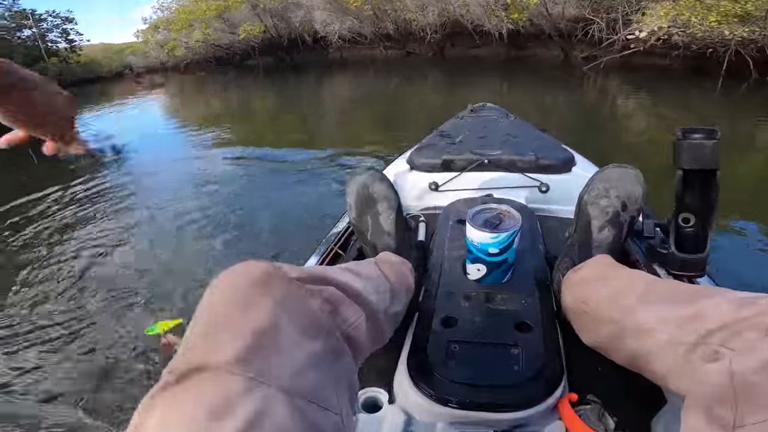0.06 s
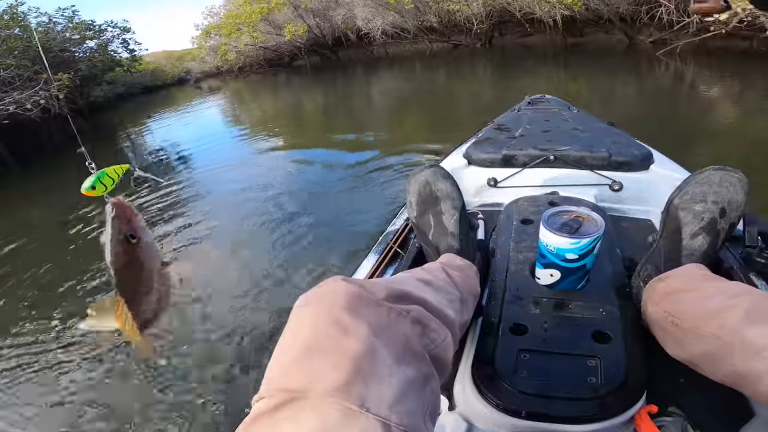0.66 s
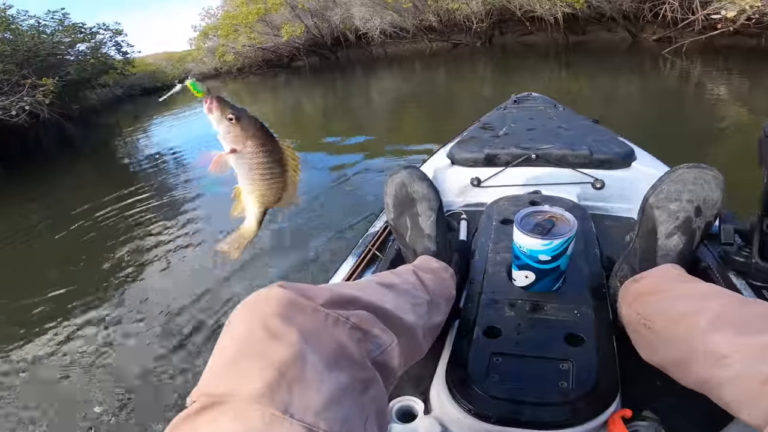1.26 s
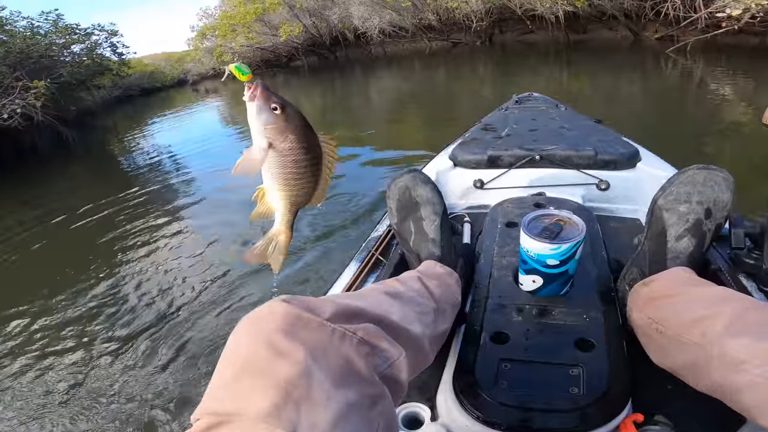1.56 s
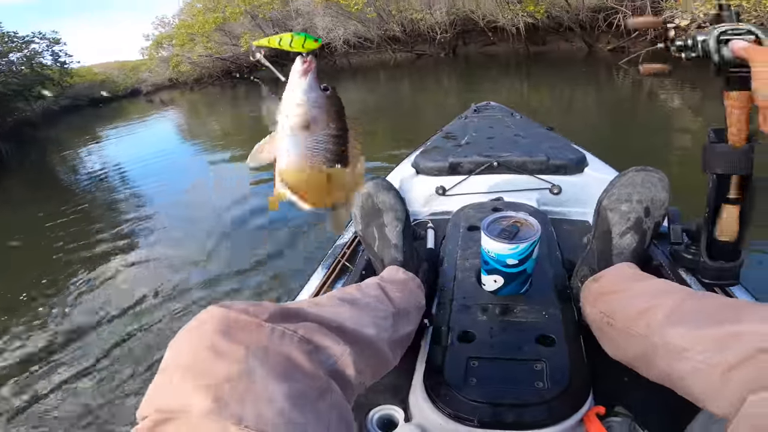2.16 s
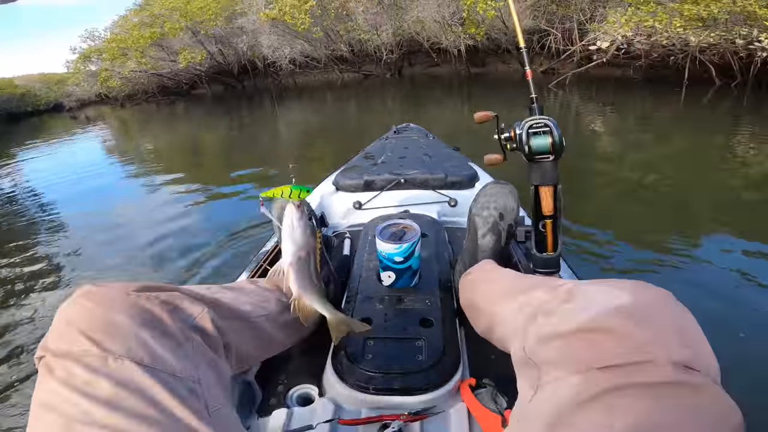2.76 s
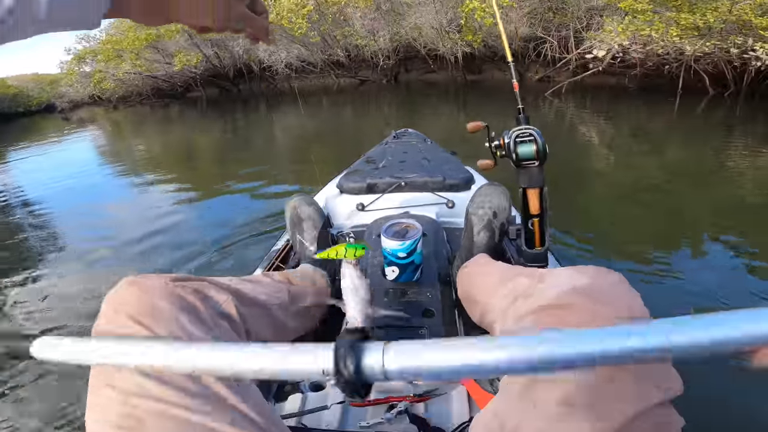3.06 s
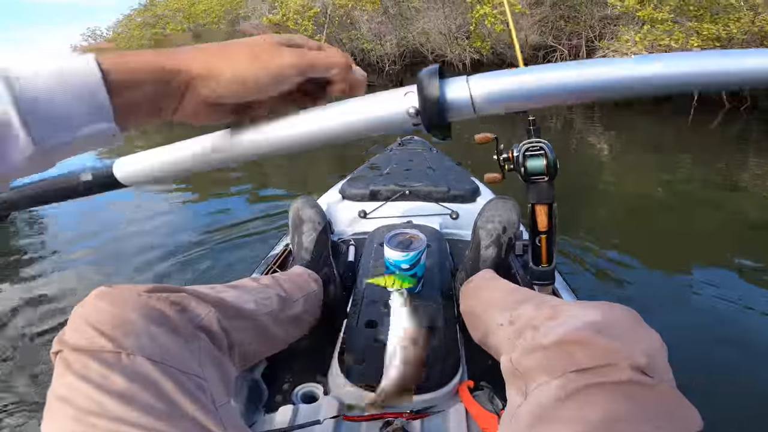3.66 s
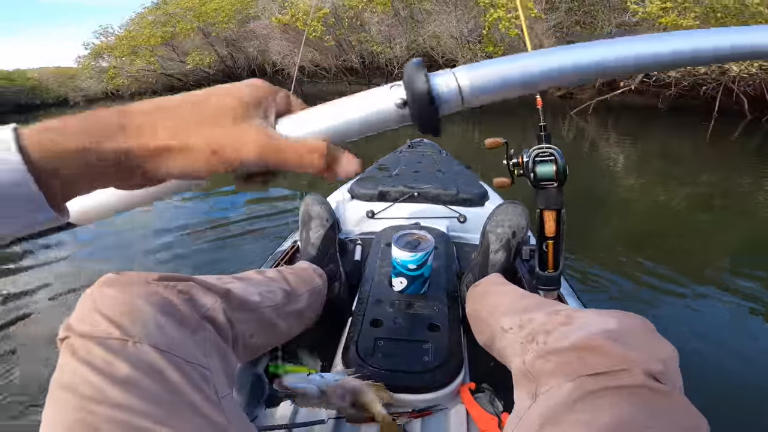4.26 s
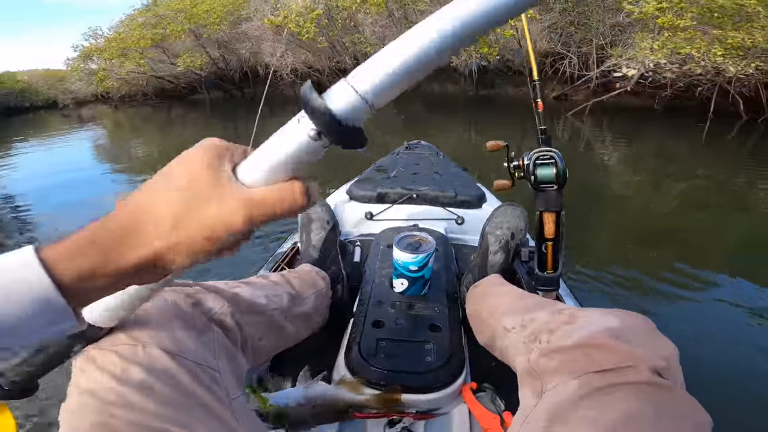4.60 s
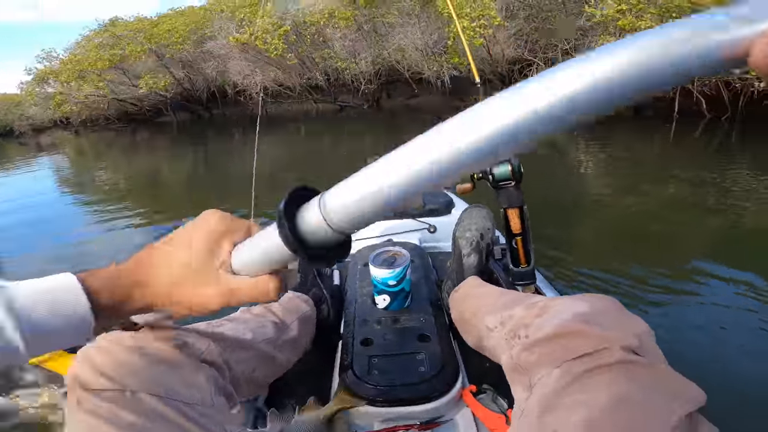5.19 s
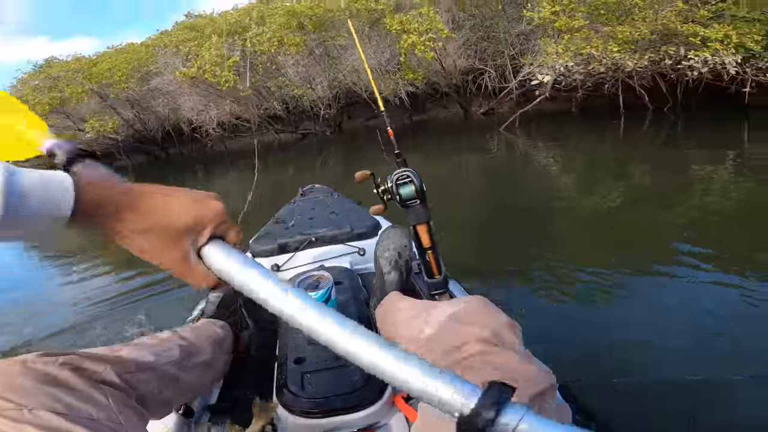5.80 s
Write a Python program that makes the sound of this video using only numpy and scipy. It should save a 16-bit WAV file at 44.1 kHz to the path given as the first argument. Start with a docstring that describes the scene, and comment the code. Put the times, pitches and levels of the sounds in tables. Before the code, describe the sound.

A beaded fishing lure rattles as a hooked fish thrashes and knocks on a hollow plastic kayak, then a paddle stirs bubbling water.

```python
"""A beaded lure rattles as a small hooked fish is swung aboard a plastic kayak on a quiet creek.
Close to the body-worn microphone, the beads strike the lure's shell and burst out when the fish thrashes.
Water drips off the fish, the line rasps, and rod, feet and fish knock and drag on the hollow hull.
At the end, on the left, a sleeve rustles and a paddle blade dips in and pulls, stirring up bubbles.
A light breeze buffets the microphone throughout."""
import sys
import numpy as np
from scipy import signal
from scipy.io import wavfile
from scipy.ndimage import uniform_filter1d, map_coordinates

SR = 44100
rng = np.random.default_rng(int(sys.argv[2]) if len(sys.argv) > 2 else 0)


def unload_wav(signal):
    """Save mono or channel-first audio to the path in sys.argv[1] as 16-bit WAV at rate SR, clipped to [-1, 1]."""
    wavfile.write(
        sys.argv[1],
        SR,
        np.round(np.clip(np.atleast_2d(signal).T, -1, 1) * 32767).astype(np.int16),
    )


N = 261821


def amp(db):
    """Decibels to gain."""
    return 10 ** (np.asarray(db) / 20)


def unit(x):
    """Scales to rms 1."""
    return x / np.sqrt(np.mean(x ** 2) + 1e-20)


def read(points, hz):
    """Reads a curve on a log-frequency axis."""
    f, value = np.transpose(points)
    return np.interp(np.log(hz + 1), np.log(f), value)


def level(rows):
    """A curve in dB as a gain for every sample."""
    s, db = np.transpose(rows)
    return amp(np.interp(np.arange(N) / SR, s, db))


def bouts(rows, attack_s, t60, swell=0):
    """Gain of movements that rise, hold and die away; swell adds a share of their length to the rise."""
    t = np.arange(N) / SR
    power = np.zeros(N)
    for s, length, db in rows:
        rise = np.clip((t - s) / (attack_s + swell * length), 0, 1)
        power += (rise * amp(db - 60 * np.maximum(t - s - length, 0) / t60)) ** 2
    return np.sqrt(power)


def add(mix, s, sound):
    """Mixes a sound in at time s."""
    part = mix[..., max(round(s * SR), 0):][..., :sound.shape[-1]]
    part += sound[..., :part.shape[-1]]


def colour(x, points, tilt_db=0, size=2048):
    """Causal filter with the given spectrum, tilted by tilt_db per octave above 500 Hz."""
    hz = abs(np.fft.fftfreq(size, 1 / SR))
    log_gain = np.log(amp(read(points, hz) + tilt_db * np.log2(np.maximum(hz, 500) / 2000)))
    taps = np.fft.ifft(np.exp(np.conj(signal.hilbert(log_gain)))).real
    return signal.oaconvolve(x, taps.reshape((1,) * (x.ndim - 1) + (-1,)), axes=-1)[..., :x.shape[-1]]


def band(x, hz, kind, order=2):
    """Butterworth filter."""
    return signal.sosfilt(signal.butter(order, hz, kind, fs=SR, output="sos"), x)


def pair(count, apart):
    """Left and right noise: alike when apart is 0, independent at 1."""
    mid, side = rng.standard_normal((2, count))
    return unit(np.array([mid + apart * side, mid - apart * side]))


def place(x, left_db):
    """Leans a sound to the left of the microphone."""
    return x * amp(np.array([[left_db], [-left_db]]) / 2)


def wander(count, size):
    """A random curve of rms 1 that changes over size samples."""
    return unit(uniform_filter1d(uniform_filter1d(rng.standard_normal(count), size), size))


def impulses(count, per_s, spread_db):
    """Tiny impacts at random moments, a few much harder than the rest."""
    chance, size, sign = rng.random(count), rng.exponential(1, count), rng.choice([-1, 1], count)
    return (chance < per_s / SR) * sign * amp(spread_db * np.minimum(size, 3))


# Breeze on the microphone. Each row: time in seconds, level in dB.
GUSTS = [(0, -27), (.2, -36.5), (.9, -46), (1.3, -47), (2.3, -48.5), (3.2, -38), (3.9, -53), (4.8, -45),
         (5.3, -56), (5.94, -50.5)]
# Its rumble, and the air over the creek. Each row: frequency in Hz, relative level in dB.
GUST_SPECTRUM = [(12, -3), (30, -0.5), (55, 3), (100, -12.5), (180, -18), (400, -34), (1500, -72)]
CREEK_SPECTRUM = [(60, -2.5), (200, -7), (800, -21.5), (1700, -22.5), (4000, -21.5), (6200, -25),
                  (12000, -36.5), (16000, -94)]

def air():
    """A light breeze buffets the microphone over the faint, wide hiss of the creek."""
    gusts = unit(colour(pair(N, 0.77), GUST_SPECTRUM, size=8192)) * level(GUSTS)
    return gusts + amp(-60) * unit(colour(pair(N, 0.74), CREEK_SPECTRUM))


def bubble(hz, t60, rough=0, rise=0.064):
    """A bubble rings and rises in pitch as it nears the surface; churning water roughens it."""
    t = np.arange(int(t60 * SR)) / SR
    churn = 1 - rough + rough * (wander(len(t), size=60) + 1j * wander(len(t), size=60))
    turns = hz * (t + rise * t ** 2 / t60 / 2)
    return amp(-60 * t / t60) * (1 - np.exp(-t * hz)) * (churn * np.exp(2j * np.pi * turns)).imag


def slosh(per_s, spray_db):
    """Short-lived bubbles of 36 sizes, per_s of each a second, with clumps of fine spray."""
    swarm = np.zeros((2, N))
    for hz in np.geomspace(220, 3800, 36):
        ring = bubble(hz, t60=0.042 * (1000 / hz) ** 0.5) * (hz / 1000) ** 0.064
        swarm += place(signal.oaconvolve(impulses(N, per_s, 3), ring)[:N], rng.normal(0, 2))
    spray = impulses(N, 60 * per_s, 3.5) * pair(N, .3) * amp(3 * wander(N, size=400))
    return unit(swarm) + amp(spray_db) * unit(spray)


# Water running off the fish. Each row: start in seconds, length in seconds, level in dB.
RUNOFF = [(-0.02, 0.023, -50.5), (.28, 0.057, -60.5), (.46, .17, -59.5), (.72, 0.54, -61.5),
          (1.78, 0.99, -62.5), (2.74, 0.051, -46), (2.85, .14, -62.5)]
# Drops landing on the creek. Each row: frequency in Hz, relative level in dB.
PATTER_SPECTRUM = [(300, -13), (900, -2), (1600, -5), (3000, 0), (4300, -1.5), (6000, -10.5), (14000, -28)]

def drips(paddle_spray):
    """Drops from the fish, and later from the paddle, patter on the creek to the left."""
    falling = bouts(RUNOFF, attack_s=0.0079, t60=.3) + paddle_spray
    patter = unit(colour(slosh(per_s=32, spray_db=14.5), PATTER_SPECTRUM))
    return place(patter * falling, left_db=6.8)


# Modes of the lure's plastic shell. Each row: frequency in Hz, width in Hz, relative level in dB.
SHELL_MODES = [(3130, 370, -1.5), (4120, 250, -4), (4970, 320, -1), (5400, 130, 2), (5770, 230, 2),
               (6254, 370, 12.5), (6850, 300, -30), (9240, 760, -0.5), (9620, 98, -8), (12100, 430, -27)]
# A bare bead's click. Each row: frequency in Hz, relative level in dB.
CLICK_SPECTRUM = [(300, -42), (1200, -18.5), (2500, -2), (4000, 10.5), (6500, 3), (8000, 1.5), (10000, -5),
                  (13000, -9.5), (16000, -30)]

def shell(strikes, click_db, vary=0.59):
    """Each strike clicks and rings the modes in its own mixture, unlike on each side as the lure twists."""
    count, t = len(strikes), np.arange(700) / SR
    ring = np.zeros((2, count))
    for hz, width, db in SHELL_MODES:
        drive = strikes * (1 - vary + vary * pair(count, 0.95))
        mode = width * np.exp(-np.pi * width * t) * np.sin(2 * np.pi * hz * t)
        ring += amp(db) * signal.oaconvolve(drive, mode[None], axes=1)[:, :count]
    clicks = colour(strikes * (0.6 + .5 * pair(count, 0.33)), CLICK_SPECTRUM)
    return unit(unit(ring) + amp(click_db) * unit(clicks))


def hops(strikes, mean_gap_s=.0012, hop_db=-3.5):
    """Every bead hops twice more, weaker each time, before it comes to rest."""
    at = np.flatnonzero(strikes)
    out, size = strikes.copy(), strikes[at]
    for gap, turn in rng.random((2, 2, len(at))):
        at = np.minimum(at + (mean_gap_s * SR * (.5 + gap)).astype(int), len(out) - 1)
        size = size * amp(hop_db) * np.sign(turn - .5)
        out[at] += size
    return out


# The fish wriggles on the line. Each row: start in seconds, length in seconds, level in dB.
FISH_WRIGGLES = [(0.0, 0.037, -60), (0.26, 0.025, -49.5), (0.43, 0.017, -52), (0.5, 0.13, -56),
                 (0.71, 0.2, -48.5), (1.01, .25, -47.5), (1.31, 0.05, -58), (1.48, 0.041, -49.5),
                 (1.75, 0.197, -49), (2.02, 0.19, -44), (2.29, 0.11, -44.5), (2.48, 0.099, -54),
                 (3.04, 0.0733, -58.5), (3.51, .1, -35), (3.69, .25, -35), (4.03, 0.46, -39),
                 (4.73, 0.12, -37.5), (4.89, 0.15, -41.5), (5.48, 0.064, -48), (5.64, 0.23, -44.5)]
# The dangling lure sways between bouts. Each row: time in seconds, level in dB.
LURE_SWAY = [(0.2, -77), (0.66, -70.5), (0.95, -57), (1.45, -65.5), (2.0, -54), (3.15, -72), (3.45, -48.5),
             (4.0, -44), (4.6, -54), (5.3, -54.5), (5.94, -55)]

def rattle():
    """The beads strike faster and louder with harder shaking; quiet rattling has its top filtered off."""
    shake = np.hypot(level(LURE_SWAY), bouts(FISH_WRIGGLES, attack_s=0.0069, t60=0.17, swell=0.04))
    clumps = amp(2.5 * wander(N, size=220))  # beads bounce in quick runs
    per_s = 220 * clumps * (shake / amp(-48)) ** .7
    beads = shell(hops(impulses(N, per_s, spread_db=3.5) * np.sqrt(clumps)), click_db=-7)
    running_rms = np.sqrt(abs(uniform_filter1d((beads ** 2).mean(0), 3500)) + 0.0072)
    lowpassed = signal.oaconvolve(beads, signal.firwin(15, 11340, fs=SR)[None], "same")
    treble_share = np.minimum(shake / amp(-37.5), 1)
    return shake * (lowpassed + treble_share * (beads - lowpassed)) / running_rms


def twist(x, patchy_db):
    """As the lure twists, different parts of its ring point at the microphone."""
    spectra = signal.stft(x, nperseg=256)[2]
    patches = rng.standard_normal(spectra.shape[1:])
    patches = uniform_filter1d(uniform_filter1d(patches, size=5, axis=0), size=5, axis=1)
    return signal.istft(spectra * unit(amp(patchy_db * unit(patches))))[1][:, :N]


def cockpit(x, wet_db, t60):
    """Deck, legs and gear around the microphone scatter a short tail."""
    t = np.arange(SR // 8) / SR
    tail = pair(len(t), 0.16) * amp(-60 * t / t60) * (1 - np.exp(-t / 0.0081))
    return x + amp(wet_db) * signal.oaconvolve(x, tail / np.linalg.norm(tail[0]), axes=1)[:, :N]


# The lure's balance at the microphone. Each row: frequency in Hz, left over right in dB.
LURE_BALANCE = [(2000, -1), (4400, 4.5), (6300, -4.5), (8500, -6.5), (15000, -9)]

def lure():
    """Beads and hooks sound close to the microphone, with the cockpit around them."""
    beads = twist(rattle() + jerks(), patchy_db=2.7)
    left, right = cockpit(beads + hooks(), wet_db=-16, t60=.05)
    return np.array([colour(left, [(hz, db / 2) for hz, db in LURE_BALANCE]),
                     colour(right, [(hz, -db / 2) for hz, db in LURE_BALANCE])])


def struck(x, db):
    """Sets the rms level of a blow's first 30 ms or so."""
    return amp(db) * x / np.sqrt(np.mean(x[..., :1300] ** 2) + 1e-20)


# Modes of the hull. Each row: frequency in Hz, relative level in dB, t60 in seconds.
HULL_MODES = [(48, -6, .22), (84, -4, .24), (126, 3, .22), (140, 3, .18), (180, -4, .17), (228, -4, .17),
              (280, -5, .13), (335, -1, .13), (388, -2, .11), (445, -1, .09), (503, 1, .1), (590, -2, .08),
              (720, -7, .07), (970, -9, .05), (1180, -12, .05)]
# The air inside it. Each row: frequency in Hz, relative level in dB.
CAVITY_SPECTRUM = [(25, -10), (50, -4), (130, 9), (240, 1.5), (400, -12), (600, -8), (1000, -32),
                   (3000, -43.5), (8000, -58)]
# How long that air rings. Each row: frequency in Hz, t60 in seconds.
CAVITY_DECAY = [(50, 1), (200, 0.43), (500, 0.54), (1500, 0.6), (6000, 0.25)]

def hull_ring(t):
    """The hull's modes ring, in another mixture at each spot struck, and the air inside rings on."""
    hz, db, t60 = np.transpose(HULL_MODES)[:, :, None]
    spot, detune = rng.standard_normal((2, len(HULL_MODES), 1))
    turns = hz * (1 + .05 * detune) * t + rng.random((len(HULL_MODES), 1))
    modes = (amp(db + 2 * spot - 60 * t / t60) * np.sin(2 * np.pi * turns)).sum(0)
    modes *= 1 - np.exp(-t / 0.00068)  # the wall takes a moment to give
    f, when, noise = signal.stft(pair(len(t), 0.055), SR, nperseg=1024)
    cavity_db = read(CAVITY_SPECTRUM, f)[:, None] - 60 * when / read(CAVITY_DECAY, f)[:, None]
    inside = signal.istft(noise * amp(cavity_db), SR)[1][:, :len(t)]
    return struck(modes, 0) + struck(inside * (1 - np.exp(-t / 0.0095)), -11.5)


# Blows on the hull. Each row: start in seconds, relative levels of boom, body and crack in dB,
# t60 of the crack in seconds.
HULL_BLOWS = [(0.073, -37, -73, -70, .035), (0.133, -33.5, -68, -62.5, .024),
              (0.207, -50, -46.5, -49.5, 0.029), (0.498, -17, -25, -42.5, 0.072),
              (0.515, -21, -21.5, -31, 0.019), (0.583, -30.5, -49.5, -43, 0.017),
              (0.787, -21.5, -36, -49.5, 0.035), (0.997, -45, -41.5, -48, 0.051),
              (1.133, -43, -35, -59, 0.051), (1.326, -30, -34.5, -41.5, 0.027),
              (1.662, -16, -26, -41.5, 0.015), (1.741, -31, -29.5, -47.5, 0.021),
              (1.809, -30.5, -40, -51.5, 0.015), (1.921, -28.5, -23.5, -52.5, 0.11),
              (2.29, -45, -38, -47, 0.0246), (2.312, -23, -17.5, -35, .035),
              (2.327, -38.5, -21.5, -33, 0.043), (2.375, -37.5, -21.5, -40.5, .02),
              (2.41, -7.5, -7.5, -23.5, 0.021), (2.557, -19, -13.5, -27, 0.032),
              (2.642, -29.5, -29.5, -42.5, 0.019), (2.688, -39, -33, -44, 0.04),
              (2.833, -40, -40.5, -46, 0.032), (2.957, -54.5, -67, -48, 0.053),
              (3.019, -31, -45.5, -78, 0.032), (3.095, -40, -70, -75.5, 0.036),
              (3.129, -32.5, -39.5, -55.5, .02), (3.189, -30, -60, -61, 0.018),
              (3.526, -18, -37, -24, 0.051), (3.534, -18.5, -19.5, -23, 0.1),
              (3.571, -45, -46, -23.5, 0.15), (3.849, -17, -20, -30.5, 0.071),
              (3.863, -21.5, -24, -28.5, 0.05), (3.91, -24, -28, -35, 0.038), (4.007, -52, -42, -49, 0.078),
              (4.2, -55.5, -43.5, -33.5, 0.023), (4.331, -44, -47, -43.5, 0.021),
              (4.352, -39, -33.5, -43, 0.065), (4.666, -29.5, -25.5, -38.5, 0.08),
              (5.526, -48, -25, -45, 0.14)]
# The crack of the plastic wall. Each row: frequency in Hz, relative level in dB.
CRACK_SPECTRUM = [(100, -32.5), (500, 16.5), (1000, 17.5), (1500, 13.5), (2200, 12), (3300, 6.5),
                  (4700, 0.5), (6500, -15), (10000, -31), (16000, -63)]

def knocks():
    """Rod, feet and fish hit the kayak just below the microphone: the wall cracks, the hull booms."""
    out, t = np.zeros((2, N)), np.arange(SR * 3 // 4) / SR
    for s, boom_db, body_db, crack_db, crack_t60 in HULL_BLOWS:
        ring = hull_ring(t)
        boom = struck(band(ring, 134, "low"), boom_db - 2)
        # a soft blow with little crack stays in contact longer and misses the upper modes
        contact_hz = np.clip(680 * 2 ** ((crack_db - body_db) / 18), 200, 1400)
        body = struck(band(band(ring, 155, "high", order=3), contact_hz, "low", order=3), body_db - 2)
        decay = amp(-60 * t / crack_t60) + amp(-20.5 - 60 * t / 0.26)
        chatter = pair(len(t), 0.41) * (1 - np.exp(-t / 0.00027)) * decay
        tilt_db = 2 - 3 * np.log2(crack_t60 / 0.03124)  # long, soft, wet slaps are dull
        crack = struck(colour(chatter, CRACK_SPECTRUM, tilt_db), crack_db + .5)
        add(out, s, boom + body + crack)
    return out


# The fish is hoisted. Each row: start in seconds, length in seconds, level in dB.
HOIST = [(.13, .37, -61)]
# The rasp of line on rod. Each row: frequency in Hz, relative level in dB.
GUIDE_SPECTRUM = [(900, -29.5), (1400, 3.5), (1650, 1), (2000, -15.5), (2700, -10.5), (6000, -39.5)]

def line():
    """The taut line rubs faintly through the rod's guides."""
    rasp = impulses(N, per_s=4800, spread_db=2) * pair(N, 0.48)
    return unit(colour(rasp, GUIDE_SPECTRUM)) * bouts(HOIST, attack_s=.08, t60=0.13)


# Single bubbles and drips beside the boat. Each row: start in seconds, pitch in Hz, level in dB.
BUBBLE_PLOPS = [(0.285, 1460, -34), (0.611, 2990, -35), (2.771, 1176, -34.5), (2.797, 4140, -33),
                (4.672, 449, -14.5), (4.723, 326.7, -17.5), (4.824, 527, -30), (4.884, 2390, -23),
                (4.978, 881, -28), (5.054, 920, -21.5), (5.121, 1314, -19), (5.142, 1547, -23.5),
                (5.183, 460, -17), (5.207, 618, -19), (5.275, 1337, -20.5), (5.321, 440, -18),
                (5.461, 1174, -15.5), (5.524, 902, -11.5), (5.541, 743, -10.5), (5.59, 1030, -13),
                (5.616, 466, -10), (5.855, 386, -20), (5.913, 545, -21.5)]

def plops():
    """Bubbles ring one by one; the larger, lower ones last a little longer."""
    out = np.zeros(N)
    for s, hz, db in BUBBLE_PLOPS:
        t60 = 0.042 * (1000 / hz) ** 0.094
        add(out, s, amp(db) * bubble(hz, t60, rough=np.clip(hz / 2400, .25, .7)))
    return out


# Movements across the deck. Each row: start in seconds, length in seconds, level in dB.
DECK_DRAGS = [(.56, 0.15, -37.5), (.98, 0.089, -40.5), (1.33, 0.12, -41), (1.74, 0.11, -38),
              (2.7, 0.148, -46), (3.5, 0.87, -42.5), (4.58, 0.15, -36), (5.05, 0.74, -44)]
# The deck's drumming. Each row: frequency in Hz, relative level in dB.
DECK_SPECTRUM = [(40, -30), (110, -2.5), (180, 7), (260, 2.5), (380, -11), (600, -31), (1200, -56),
                 (4000, -38)]

def drags():
    """Legs and gear drag on the deck and make it drum."""
    catches = impulses(N, per_s=260, spread_db=2.5) * (1 + 0.041 * pair(N, 0.9))
    return unit(colour(catches, DECK_SPECTRUM)) * bouts(DECK_DRAGS, attack_s=0.026, t60=0.49)


# The fish thrashes. Each row: start in seconds, level in dB, length in seconds.
FISH_JERKS = [(0.703, -47.5, 0.018), (0.883, -28, .0012), (1.024, -39.5, 0.0019), (1.167, -40, 0.0021),
              (1.205, -37.5, .003), (1.316, -40, 0.0037), (1.373, -41, 0.0025), (1.625, -37, 0.0011),
              (1.756, -38.5, 0.0054), (1.886, -41, 0.013), (2.353, -36, 0.017), (2.504, -45, 0.0026),
              (2.554, -36, 0.0041), (3.338, -49.5, .002), (3.368, -37, 0.0074), (3.484, -36, 0.02),
              (3.515, -21, 0.0059), (3.524, -30, 0.02), (3.554, -20, 0.0087), (3.636, -30.5, 0.0047),
              (3.65, -20, 0.024), (3.707, -29, .012), (3.722, -24.5, .03), (3.81, -27, 0.013),
              (3.829, -27.5, 0.038), (3.927, -27, 0.01376), (3.986, -33, .005), (4.176, -28, 0.017),
              (4.256, -36, 0.0023), (4.329, -34, 0.042), (4.73, -39, 0.025), (4.764, -35, 0.015),
              (4.805, -29.5, 0.0051), (5.491, -35, 0.00109), (5.645, -36.5, .045), (5.855, -29, 0.0019)]

def jerks():
    """Each sharp jerk flings all the beads against the shell at once."""
    out, t = np.zeros((2, N)), np.arange(SR // 8) / SR
    for s, db, length in FISH_JERKS:
        settling = np.exp(-np.maximum(t - length, 0) / (.001 + .35 * length))
        fling = impulses(len(t), per_s=3200, spread_db=2.4) * settling
        burst = colour(shell(fling, click_db=-1.5), [(100, 0), (16000, 0)], tilt_db=-1)
        energy = (burst ** 2).mean(0).sum()
        add(out, s, amp(db) * burst * np.sqrt((length + 0.00042) * SR / energy))
    return out


# The lure's hooks. Each row: start in seconds, pitch in Hz, level in dB, t60 in seconds.
HOOK_PINGS = [(1.108, 11830, -42, 0.012), (1.245, 6160, -31, 0.017), (3.325, 4090, -26, 0.016),
              (3.577, 5520, -27.5, 0.167), (3.598, 9700, -35, 0.12), (4.802, 6340, -23, 0.08)]

def hooks():
    """A hook rings briefly on one high note."""
    out = np.zeros(N)
    for s, hz, db, t60 in HOOK_PINGS:
        t = np.arange(int(t60 * SR)) / SR
        add(out, s, amp(db - 60 * t / t60) * np.sin(2 * np.pi * hz * t))
    return out


# Groans of the deck. Each row: start in seconds, pitch in Hz, level in dB, length in seconds.
DECK_GROANS = [(1.126, 182, -33, 0.058), (1.25, 215.7, -40, 0.076), (1.343, 215, -33.5, 0.023),
               (1.733, 229, -31, 0.047), (1.916, 191, -29.5, 0.029), (2.312, 234.4, -23, 0.0378),
               (4.088, 126, -33.5, 0.063), (5.528, 161, -29.5, 0.054)]

def groans():
    """Rubbing on the deck sticks and slips in short, low tones."""
    out = np.zeros(N)
    for s, hz, db, length in DECK_GROANS:
        t = np.arange(int(length * SR)) / SR
        add(out, s, amp(db) * unit(signal.windows.tukey(len(t), .6) * np.sin(2 * np.pi * hz * t)))
    return out


# A sleeve slides past as the paddle is lifted. Each row: start and length in seconds, level in dB.
SLEEVE_SLIDES = [(3.22, 0.69, -42.5), (4.12, 0.21, -48)]
# Its cloth. Each row: frequency in Hz, relative level in dB.
CLOTH_SPECTRUM = [(100, -18.5), (300, 5), (430, 6.5), (560, -3.5), (800, -0.5), (1200, -6), (2200, -7.5),
                  (2600, -11), (3200, -4), (4100, -0.5), (5500, -18), (14000, -30)]

def sleeve():
    """Cloth fibres catch and slip in a soft rustle just left of the microphone."""
    fibres = impulses(N, per_s=5000, spread_db=4.1) * pair(N, 0.27)
    rustle = unit(colour(fibres, CLOTH_SPECTRUM)) * bouts(SLEEVE_SLIDES, attack_s=0.15, t60=0.85)
    return place(rustle, left_db=3.63)


# The paddle dips in, pulls and lifts. Each row: time in seconds, relative level in dB.
PADDLE_STROKE = [(4.55, -72.5), (4.58, -44.5), (4.664, -37), (4.762, -49), (5.162, -33.5), (5.422, -33.5),
                 (5.534, -30), (5.878, -43), (5.937, -42.5)]

def paddle_effort():
    """How hard the blade stirs the water, rising from nothing as it enters."""
    entry = np.clip((np.arange(N) / SR - PADDLE_STROKE[0][0]) / 0.052, 0, 1)
    return level(PADDLE_STROKE) * entry


# Churned water. Each row: frequency in Hz, relative level in dB.
CHURN_SPECTRUM = [(80, -13), (180, -23), (400, 0), (900, -2), (1500, 1.5), (2500, -10.5), (4500, -6.5),
                  (8000, -22), (15000, -33)]

def paddle(effort):
    """The blade churns the creek beside the boat into bubbles and spray."""
    return amp(-1) * unit(colour(slosh(per_s=23, spray_db=-1), CHURN_SPECTRUM)) * effort


def ports(x, lag_s=4.5e-5):
    """The sound reaches the left microphone port a moment after the right."""
    return np.array([map_coordinates(x[0], [np.arange(N) - lag_s * SR], order=3), x[1]])


def scene():
    """From the kayak's seat: hull near the centre, water and sleeve to the left, the lure close by."""
    hull = place(drags() + knocks() + groans(), left_db=0.97)
    hoist = line()
    effort = paddle_effort()
    water = place(paddle(effort) + plops(), left_db=4.5) + drips(paddle_spray=amp(-13) * effort)
    return ports(hull + hoist + water + sleeve()) + lure() + air()


def record(dry):
    """A low-pass filter removes the treble above 15.7 kHz."""
    lowpass = signal.firwin(511, 15700, window=("kaiser", 9), fs=SR)
    return signal.oaconvolve(dry, lowpass[None], "same")


dry = scene()
out = record(dry)
unload_wav(out)
```